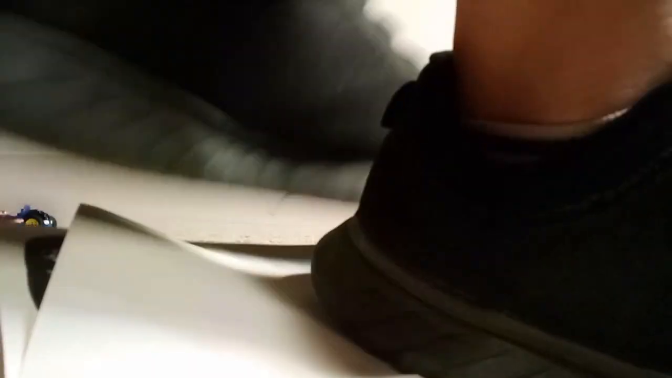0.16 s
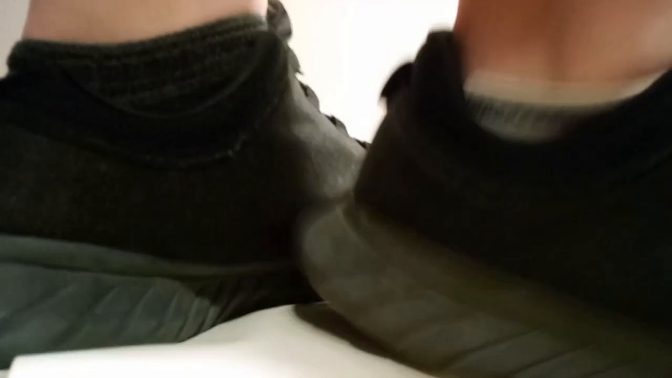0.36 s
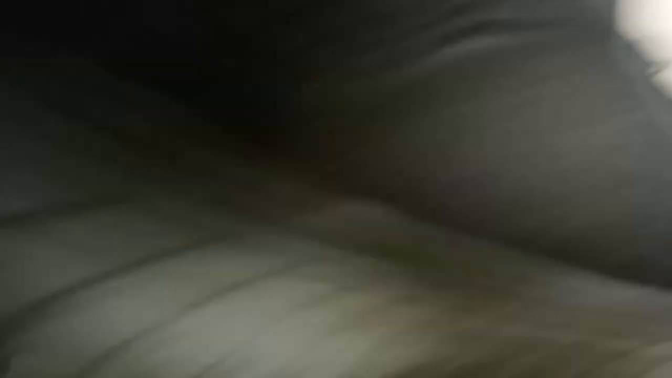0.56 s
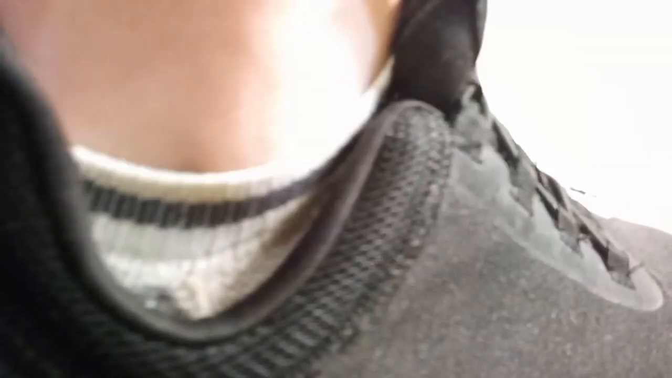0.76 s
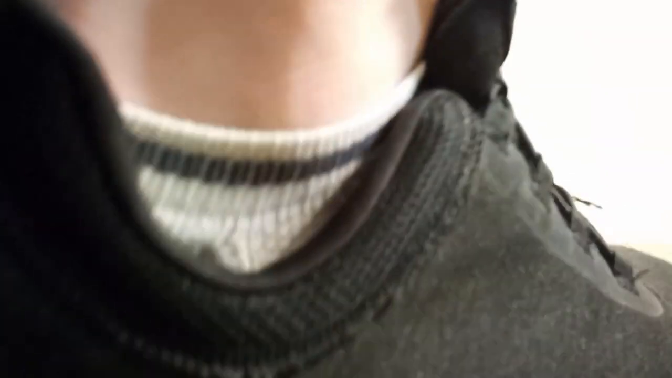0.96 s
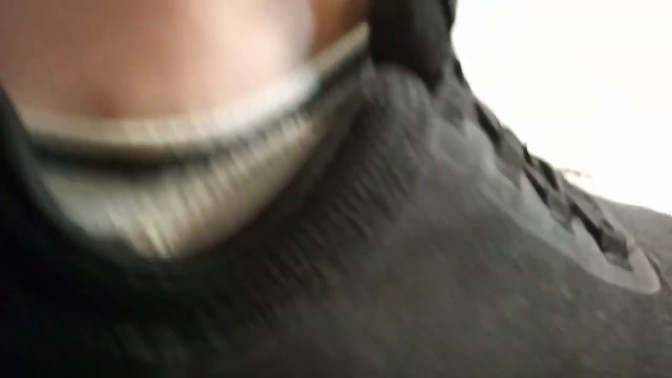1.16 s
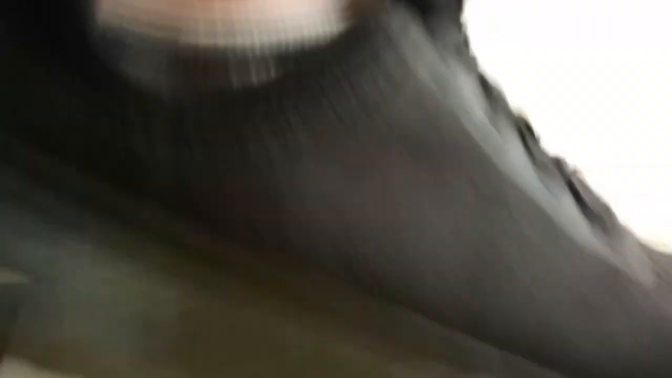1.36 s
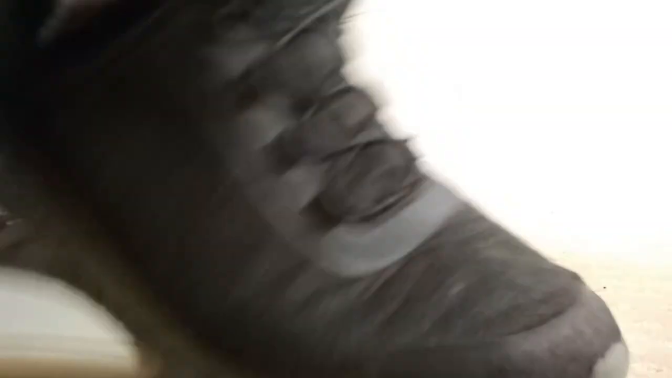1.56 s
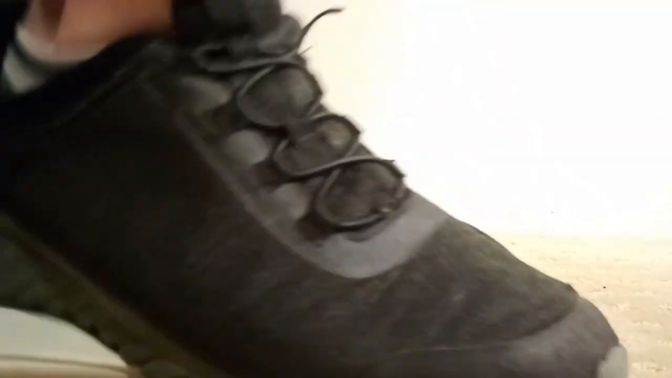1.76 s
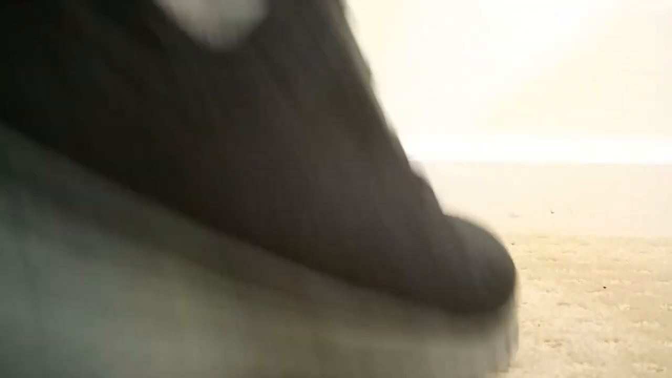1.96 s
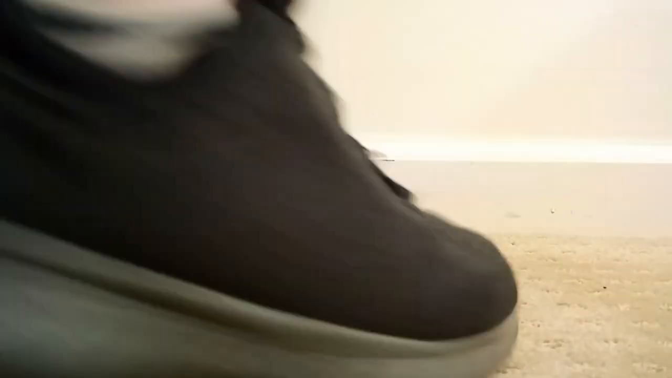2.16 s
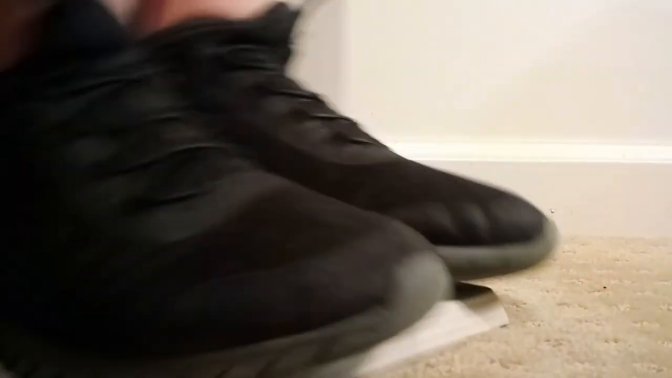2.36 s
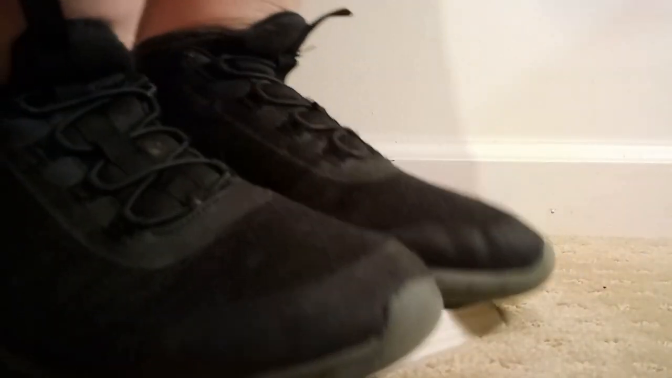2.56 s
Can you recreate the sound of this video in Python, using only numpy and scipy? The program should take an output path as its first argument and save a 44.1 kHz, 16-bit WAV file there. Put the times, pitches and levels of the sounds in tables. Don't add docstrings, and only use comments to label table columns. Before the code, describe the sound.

Shoes stamp and drag on paper over carpet indoors, heard very close and dry; sharp buckling pops cluster early, soften around one second, return as uneven rustles and ticks, then fade into faint room hiss.

```python
import sys
import numpy as np
from scipy import signal
from scipy.io import wavfile
from scipy.ndimage import uniform_filter1d

SR = 44100
rng = np.random.default_rng(int(sys.argv[2]) if len(sys.argv) > 2 else 0)


def undo_db(level):
    steps = np.asarray(level, float) / 20
    return 10 ** steps


def generate_wav(signal):
    frames = np.transpose(np.atleast_2d(signal))
    scaled = np.clip(frames, -1, 1) * 32767
    pcm = np.round(scaled).astype(np.int16)
    wavfile.write(sys.argv[1], SR, pcm)


N = 116865


def evened(x):
    return x / np.sqrt(np.mean(x ** 2) + 1e-20)


def colour(x, points):
    f, db = np.transpose(points)
    hz = abs(np.fft.fftfreq(4096, 1 / SR))
    log_gain = np.interp(np.log(hz + 1), np.log(f + 1), db) * np.log(10) / 20
    phase = -signal.hilbert(log_gain).imag
    taps = np.fft.ifft(np.exp(log_gain + 1j * phase)).real[:2048]
    return signal.oaconvolve(x, taps)[:len(x)]


def passed(x, order, hz, kind):
    return signal.sosfilt(signal.butter(order, hz, kind, fs=SR, output="sos"), x)


def add(mix, s, sound):
    part = mix[round(s * SR):][:len(sound)]
    part += sound[:len(part)]


# (frequency [Hz], level [dB])
ROOM_TONE = [(40, -3), (300, -8), (650, -3), (2000, -13), (6500, -9), (8000, -13), (10000, -10),
             (15500, -18)]


def room_tone():
    return undo_db(-69) * evened(colour(rng.standard_normal(N), ROOM_TONE))


# (time [s], peak level [dB], ring [Hz], boards against the ring [dB])
STAMPS = [(0.232, -27, 176.5, -7), (.339, -31.5, 223, -10.5), (0.457, -41.5, 210, -28),
          (0.491, -26.5, 241, -29), (0.551, -25.5, 281, -41), (0.6241, -25, 214, -13),
          (1.245, -45, 266, -33), (1.415, -27.5, 153.4, -5), (1.521, -32.5, 155, -34),
          (1.621, -40, 142, -8), (1.827, -41, 308, -21), (1.94, -33.5, 248, -14.5), (2.183, -42, 124, -20),
          (2.370, -21, 248.5, -15.5)]


def thud(peak_db, hz, board_db, noise):
    push_cycles, rumble_s, rumble_db = 3.2, 0.019, -16
    board_hz, board_s = 78.7, 0.022
    t = np.arange(len(noise)) / SR
    push = np.sin(2 * np.pi * hz * t) * np.exp(-t * hz / push_cycles) * (1 - np.exp(-t / 0.00022))
    rumble = evened(passed(noise, 1, [0.45 * hz, 2.2 * hz], "band"))
    rumble = rumble * t / rumble_s * np.exp(1 - t / rumble_s - t / 0.05)
    board = evened(passed(noise[::-1], 2, [0.5 * board_hz, 1.7 * board_hz], "band"))
    board = board * t / board_s * np.exp(1 - t / board_s)
    return undo_db(peak_db + 2.5) * (push + undo_db(rumble_db) * rumble + undo_db(board_db) * board)


# (time [s], length [s], level [dB], first pitch [Hz], last pitch [Hz])
PEEL_RUNS = [
    (0.377, 0.031, -47.5, 2455, 3300),
    (0.496, 0.0073, -37, 5950, 6000),
    (0.689, 0.035, -50, 3320, 3800),
    (0.735, 0.048, -45.5, 6200, 4500),
    (1.086, 0.023, -53, 3020, 4200),
    (1.251, 0.027, -46, 6070, 3200),
    (1.675, .022, -40.5, 2330, 6000),
    (1.713, 0.054, -43, 3860, 3300),
    (2.198, 0.092, -44.5, 3000, 2600),
]


def peel(length, level_db, first_hz, last_hz, chance):
    ticks_per_s, tick_cycles, pitch_spread = 1600, 2.2, 0.3
    count = round(ticks_per_s * length) + 1
    at, size_db, detune, phase = chance[:count].T[:, :, None]
    t = np.arange(round((length + 0.004) * SR)) / SR
    hz = first_hz * (last_hz / first_hz) ** at * np.exp(pitch_spread * (2 * detune - 1))
    age = np.maximum(t - at * length, 0) * hz / tick_cycles
    size = undo_db(-14 * size_db) * np.sin(np.pi * at ** 0.4)
    ticks = size * age * np.exp(-2 * age) * np.sin(2 * np.pi * (hz * t + phase))
    return undo_db(level_db) * evened(ticks.sum(0))


# (time [s], length [s], level [dB], pitch [Hz])
CHATTERS = [
    (0.167, 0.035, -54.5, 593),
    (0.404, 0.0047, -19.5, 1273),
    (1.35, 0.027, -35.5, 1064),
    (1.929, 0.018, -27.5, 830),
]


def chatter(length, level_db, hz, noise):
    t = np.arange(round(length * SR)) / SR
    wobble = evened(uniform_filter1d(noise[:len(t)], 90))
    tone = np.sin(2 * np.pi * np.cumsum(hz * (1 + 0.059 * wobble)) / SR)
    swell = np.sin(np.pi * (t / length) ** 0.47) ** 0.5
    return undo_db(level_db + 1.0 + 4.4 * wobble[::-1]) * tone * swell


def grit(per_s, spread_db, smooth, clump_db, clump_s):
    hit, size = rng.random(N), rng.exponential(1, N)
    rub, clump = rng.standard_normal(N), rng.standard_normal(N)
    sizes = undo_db(spread_db * np.minimum(size, 2.5))
    clicks = evened((hit < per_s / SR) * sizes * np.sign(rub))
    wide = max(round(clump_s * SR), 2)
    clumps = evened(uniform_filter1d(uniform_filter1d(clump, wide), wide))
    return (clicks + smooth * rub) * undo_db(clump_db * clumps)


# (frequency [Hz], level [dB])
CRACKLE_TONE = [(300, -12.5), (1200, 8), (3500, 6.5), (6000, 2), (9000, 0.5), (16000, -19)]
# (frequency [Hz], level [dB])
RUSTLE_TONE = [(60, 2.5), (150, -2.5), (350, 3), (620, 7), (1000, 5.5), (1600, -7), (3500, -28)]
# (frequency [Hz], level [dB])
FIZZ_TONE = [(2000, -43), (7000, -1.5), (12000, 0.5), (16000, -2.5)]
FOLLOW_POWERS = [1., 1., 3.4]
# (middle [s], half length [s], crackle [dB], sheet rustle [dB], fine fizz [dB])
DRAGS = [(0., 0.041, -66.5, -55, -74), (0.236, 0.028, -69, -45, -43.5), (0.317, 0.041, -49, -40.5, -72),
         (0.339, 0.0076, -45, -32, -35.5), (0.404, 0.063, -46, -40.5, -39.5),
         (0.496, 0.0061, -32, -45, -30), (0.53, 0.029, -37.5, -39, -34), (0.559, 0.015, -49, -30.5, -61),
         (0.636, 0.015, -69, -24, -44), (0.686, 0.027, -36, -38, -39), (0.725, 0.057, -45, -44.5, -45),
         (0.798, 0.079, -60, -54.5, -77), (1.006, 0.1, -51, -49, -55), (1.094, 0.051, -53.5, -52, -70),
         (1.219, 0.073, -56.5, -46, -59), (1.26, 0.064, -47.5, -45.5, -58), (1.373, 0.021, -49, -50, -50),
         (1.411, 0.047, -44, -35.5, -40.5), (1.50, 0.056, -36.5, -35, -38), (1.62, 0.05, -52, -41.5, -50.5),
         (1.715, 0.039, -48, -47.5, -53), (1.807, 0.069, -53.5, -49, -72),
         (1.904, 0.075, -40.5, -35, -33.5), (1.965, 0.11, -47.5, -37, -47),
         (2.223, 0.061, -40.5, -36.5, -36.5), (2.307, 0.07, -39, -38, -42.5),
         (2.414, 0.076, -60.5, -63, -57.5), (2.167, 0.053, -51, -42.5, -56),
         (2.643, 0.076, -64, -48.5, -64)]


def scuff():
    edge_db, swell_shape = -12.5, 2.6
    settle_s, settle_db = 0.206, -65
    mid, half, *layers_db = np.array(DRAGS).T[:, :, None]
    t = np.arange(N) / SR
    swell = undo_db(2 * edge_db * np.minimum(abs(t - mid) / half, 5) ** swell_shape)
    settle = undo_db(2 * settle_db) * (t > settle_s)
    crackle = grit(per_s=3000, spread_db=-1, smooth=0.96, clump_db=2.0, clump_s=0.00068)
    rustle = grit(per_s=3100, spread_db=10.0, smooth=1.0, clump_db=2.5, clump_s=0.0043)
    fizz = grit(per_s=8000, spread_db=2.5, smooth=1.5, clump_db=1.5, clump_s=0.003)
    layers = [(crackle, CRACKLE_TONE), (rustle, RUSTLE_TONE), (fizz, FIZZ_TONE)]
    total = np.zeros(N)
    for (sound, tone), db, power in zip(layers, layers_db, FOLLOW_POWERS):
        strength = np.sqrt((swell ** power * undo_db(2 * db)).sum(0) + settle)
        total += strength * evened(colour(sound, tone))
    return total


# (time [s], peak level [dB], ring [Hz], crack against the ring [dB])
SNAPS = [(.170, -46.5, 626, -5), (.208, -26.5, 380, -26), (.2305, -19, 580, -23),
         (.2555, -18.5, 610, -28), (.2625, -10.5, 874, -22), (.271, -14.5, 670, -42),
         (.317, -23.5, 620, -16), (.339, -26.5, 291, -8.5), (.404, -24.5, 1130, -21),
         (.455, -16.5, 580, -30), (.490, -9.5, 1000, -14), (.505, -12, 820, -38),
         (.539, -12, 1314, -16), (.550, -16.5, 650, -18), (.601, -21.5, 740, -37),
         (.624, -14, 586, -49), (.637, -14.5, 855, -16), (.646, -31, 915, 0),
         (.6765, -12.5, 720, -10), (.7252, -15, 985, -8.5), (.785, -25.5, 720, -20),
         (.884, -42, 710, -25), (1.046, -32, 530, -5.5), (1.0755, -25.5, 656, -5),
         (1.14, -36, 634, -20), (1.164, -27, 940, -22), (1.1995, -28.5, 1280, -15),
         (1.244, -16.5, 610, -8.5), (1.251, -22.5, 720, -11), (1.2975, -29, 905, -16),
         (1.352, -34, 690, -19), (1.399, -21, 940, -10.5), (1.422, -17, 684, -10),
              (1.471, -29.5, 440, -6), (1.487, -20.5, 1240, -4), (1.5909, -25, 720, -35),
              (1.628, -22, 522, -14), (1.668, -25, 1100, -6.5), (1.676, -24, 930, -13),
              (1.7027, -20, 740, -5), (1.788, -25.5, 1037, -44), (1.817, -29, 880, -23),
              (1.8265, -19.5, 610, -22), (1.836, -26, 825, -6), (1.855, -22, 970, -19),
              (1.878, -20.5, 1010, -5), (1.891, -22, 850, -25), (1.898, -16.5, 734, -22),
              (1.932, -31, 865, -21), (1.9806, -19, 890, -16.5), (2.004, -26, 1040, -38),
              (2.018, -25, 1210, -36), (2.029, -22.5, 633, -22), (2.051, -31.5, 606, -25),
              (2.1516, -24.5, 780, -38), (2.183, -19.5, 588, -5), (2.345, -18.5, 620, -9),
              (2.565, -38.5, 686, -18), (2.642, -35.5, 850, -28)]
# (time [s], peak level [dB], ring [Hz], crack against the ring [dB])
MORE_SNAPS = [(0.22, -47, 895, -2), (0.4089, -24, 1530, -22), (.4125, -19, 1110, -28),
              (.4525, -27, 920, -23), (0.4614, -18, 890, -38), (.497, -17.5, 910, -10.5),
              (.5105, -21, 870, -24), (.630, -22, 630, -35), (.667, -25, 890, -18), (.6735, -22, 755, -30),
              (.679, -20, 925, -9), (1.069, -28.5, 810, -32), (1.1604, -33, 900, -24),
              (1.236, -27, 640, -28), (1.257, -26, 690, -26), (1.279, -31, 605, -30),
              (1.605, -28, 720, -27), (1.619, -25, 430, -15), (1.664, -31, 1510, -25),
              (1.793, -35, 900, -30), (1.8747, -16, 1620, -21), (2.388, -28.5, 380, -44),
              (2.398, -32, 517, -40), (0.2361, -18.5, 426, -20), (.2665, -10.5, 605, -40),
              (.2765, -22.5, 574, -32), (0.285, -24.5, 640, -24), (.342, -26.5, 406, -20),
              (1.4261, -25, 540, -29), (1.431, -19, 705, -29), (1.364, -36, 1060, -30),
              (1.987, -25, 790, -28), (2.186, -30.5, 790, -27)]


def snap(peak_db, hz, crack_db, noise):
    ring_cycles, overtone, overtone_db = 1.46, 1.727, -6
    flip_s, flip_size, crack_s = 0.00006, 3.0, 0.00095
    tail_s, tail_db = 0.01, -13
    rattle_s, rattle_db = 0.0028, -12
    t = np.arange(noise.shape[1]) / SR
    turn = 2 * np.pi * hz * t
    ring = np.sin(turn) + undo_db(overtone_db) * np.sin(overtone * turn)
    ring = ring * np.exp(-t * hz / ring_cycles)

    dull_hz = min(8000 * undo_db(0.25 * crack_db), 0.4 * SR)
    dull = evened(passed(noise[0], 2, dull_hz, "low"))
    flip = flip_size * (t / flip_s - 1) * np.exp(-t / flip_s)
    spit = undo_db(crack_db) * noise[0] * np.exp(-t / 0.00015)
    tail = dull * (np.exp(-t / crack_s) + undo_db(tail_db) * np.exp(-t / tail_s))
    crack = passed(flip + spit + tail, 1, 1200, "high")

    rattle = evened(passed(noise[1], 1, [0.6 * hz, 1.6 * hz], "band"))
    rattle = rattle * np.exp(-t / rattle_s) * (1 - np.exp(-t / 0.002))
    body = passed(undo_db(rattle_db) * rattle - 1.13 * ring, 2, 0.26 * hz, "high")
    return undo_db(peak_db) * (body + undo_db(crack_db + 4.0) * crack)


def scene():
    snap_lag_s = 0.0006
    mix = scuff()
    main_snaps = SNAPS
    for (s, *how), noise in zip(main_snaps, rng.standard_normal((len(main_snaps), 2, 3000))):
        add(mix, s + snap_lag_s, snap(*how, noise))
    for (s, *how), noise in zip(STAMPS, rng.standard_normal((len(STAMPS), 9000))):
        add(mix, s, thud(*how, noise))
    for (s, *how), noise in zip(CHATTERS, rng.standard_normal((len(CHATTERS), 3000))):
        add(mix, s, chatter(*how, noise))
    for (s, *how), noise in zip(MORE_SNAPS, rng.standard_normal((len(MORE_SNAPS), 2, 3000))):
        add(mix, s + snap_lag_s, snap(*how, noise))
    for (s, *how), chance in zip(PEEL_RUNS, rng.random((len(PEEL_RUNS), 200, 4))):
        add(mix, s, peel(*how, chance))
    return np.array([mix, mix])


# (frequency [Hz], level [dB])
MIC_TONE = [(28, -34), (45, -16), (100, 0), (5000, 0), (6500, 2), (8000, -6), (10000, 3), (13200, -13),
            (14700, 3)]


def microphone(x):
    return colour(x, MIC_TONE)


def top_cut(x):
    return signal.sosfilt(signal.butter(12, 16980, fs=SR, output="sos"), x)


def record(dry):
    ceiling, edge_hz = 0.5, 15800
    x = microphone(dry[0]) + room_tone()
    x = ceiling * np.tanh(x / ceiling)
    x = signal.oaconvolve(x, signal.firwin(255, edge_hz, window=("kaiser", 5), fs=SR), "same")
    return top_cut(np.array([x, x]))


dry = scene()
out = record(dry)
generate_wav(out)
```